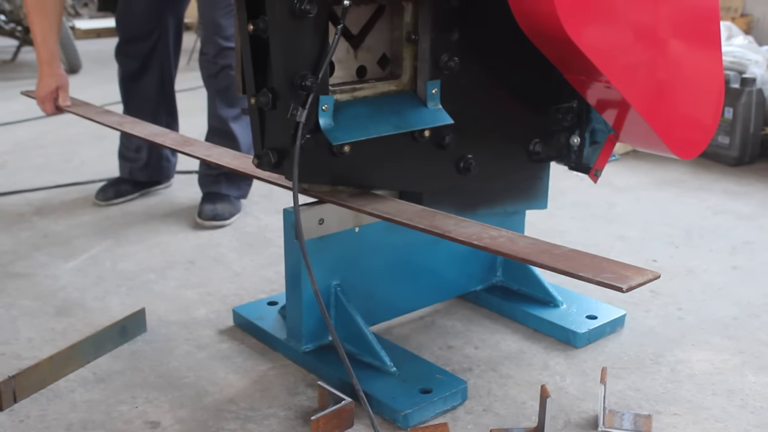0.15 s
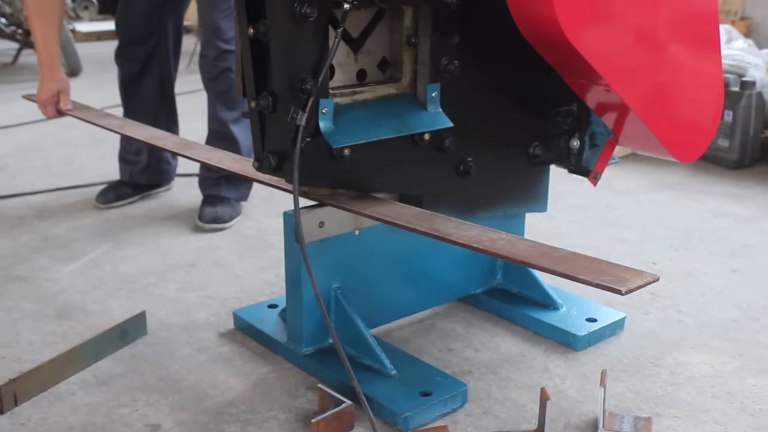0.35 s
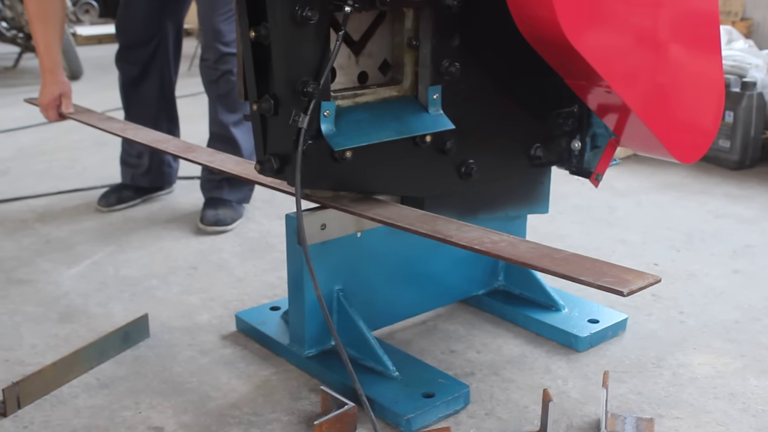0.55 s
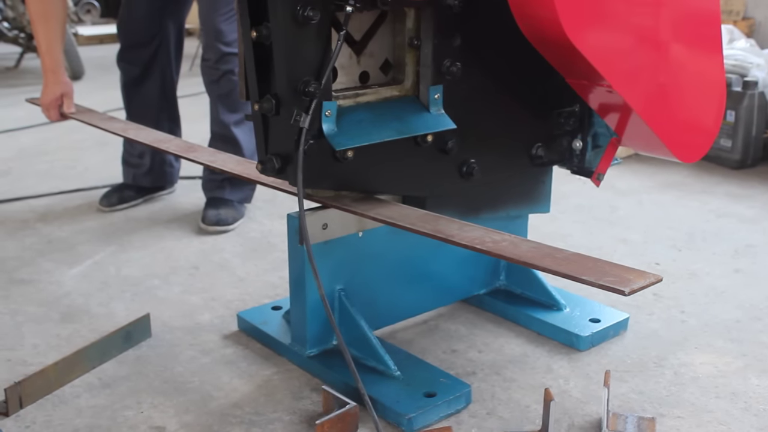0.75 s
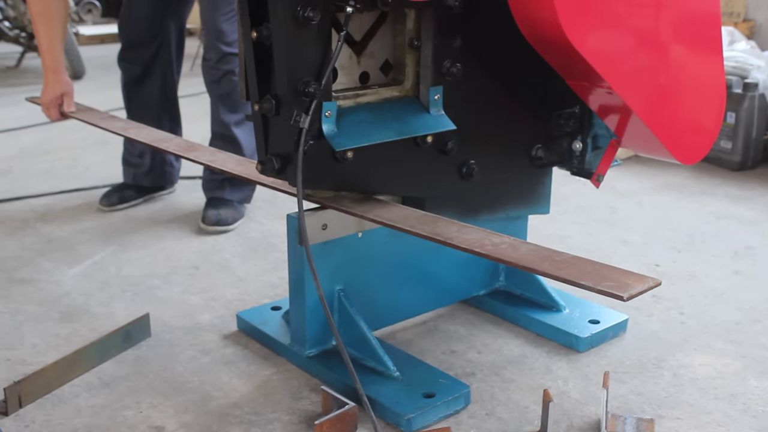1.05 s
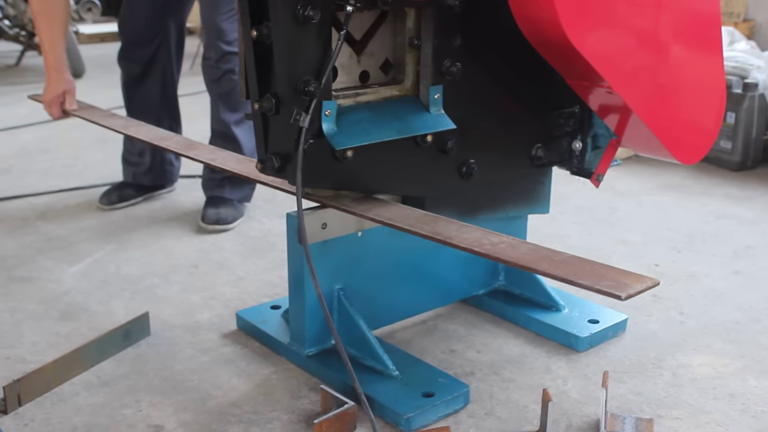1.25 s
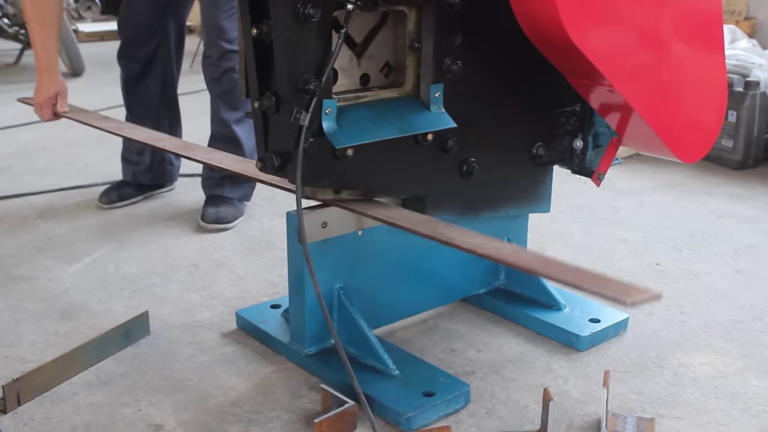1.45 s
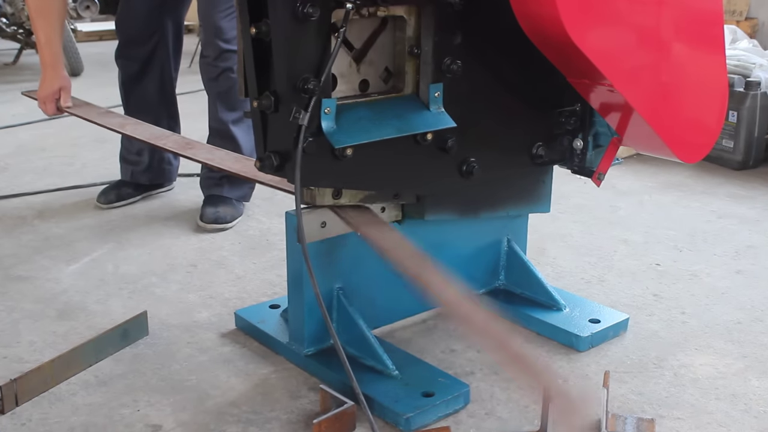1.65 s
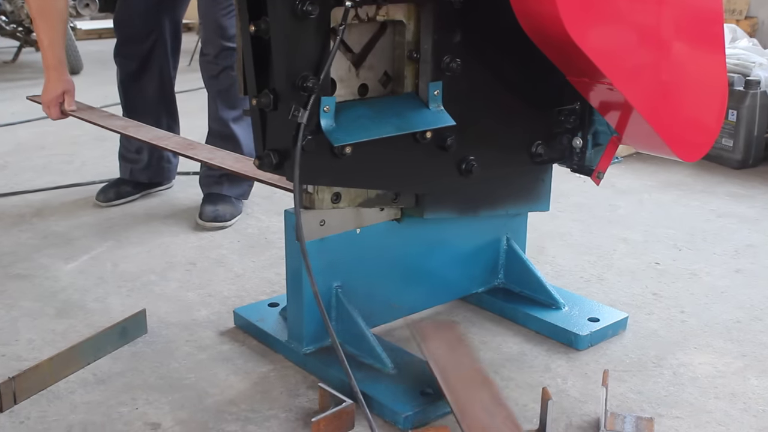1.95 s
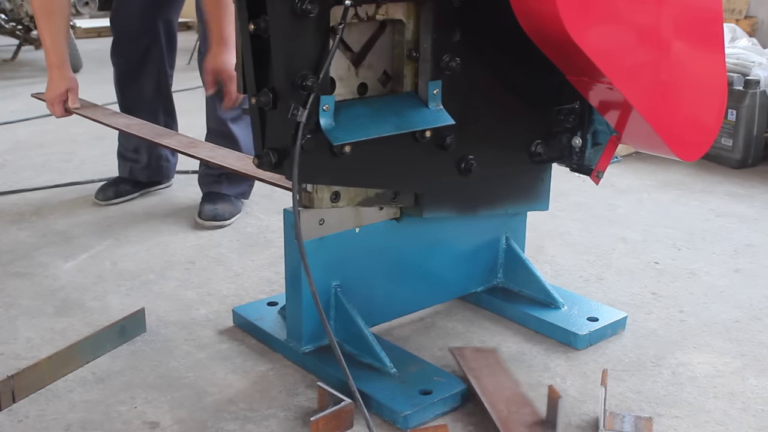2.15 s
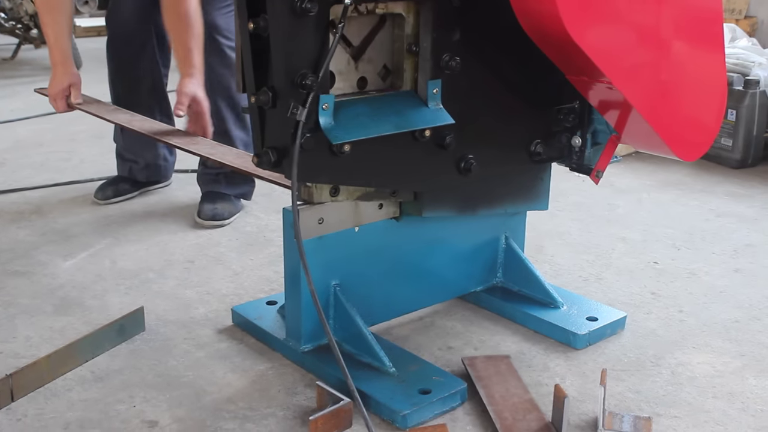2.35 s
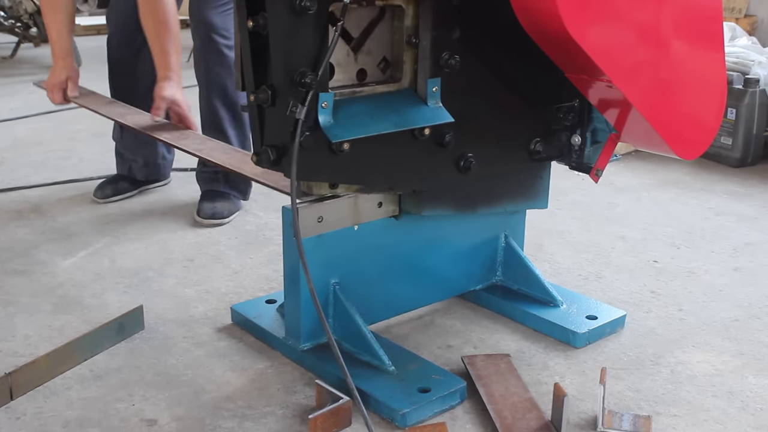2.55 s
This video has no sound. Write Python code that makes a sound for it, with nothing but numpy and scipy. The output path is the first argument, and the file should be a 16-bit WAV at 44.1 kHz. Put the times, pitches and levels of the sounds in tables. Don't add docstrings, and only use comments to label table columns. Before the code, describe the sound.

Steel offcut crashing on a concrete yard floor: first low gusty wind rumble and faint gear grind with a clack, then a quick gritty scrape, a hard slam, and bright metallic bounces and ringing, slightly ducked by automatic gain.

```python
import sys
import numpy as np
from scipy import signal
from scipy.fft import rfft, irfft, next_fast_len
from scipy.io import wavfile
from scipy.ndimage import uniform_filter1d, map_coordinates

SR = 44100
rng = np.random.default_rng(int(sys.argv[2]) if len(sys.argv) > 2 else 0)


def generate_wav(sig):
    pcm = np.round(np.clip(np.atleast_2d(sig).T, -1, 1) * 32767).astype(np.int16)
    wavfile.write(sys.argv[1], SR, pcm)


def boost_factor(decibels):
    exponent = np.asarray(decibels, float) / 20
    return 10 ** exponent


N = 119511

# (time [s], level [dB])
WIND_LEVEL = [(0, -26.5), (.25, -17.5), (.66, -16), (.72, -28.5), (.86, -25.5), (.95, -26), (1.7, -18),
              (1.8, -35), (2.1, -33), (2.3, -45), (2.71, -31)]
# (time [s], level [dB], half width [s])
GUSTS = [(0.031, -26, 0.019), (0.117, -6.5, 0.0043), (0.122, -12, 0.022), (0.144, -10.5, 0.0029),
         (0.223, -10.5, 0.0075), (0.252, -17, 0.02), (0.332, -8.5, 0.014), (0.405, -22, 0.0045),
         (0.447, -14, 0.005), (0.292, -12.5, 0.011), (0.363, -10.5, 0.019), (0.465, -10.5, 0.021),
         (0.589, -13.5, 0.0073), (0.609, -9, 0.007), (0.661, -6.5, 0.0041), (0.821, -16.5, 0.0031),
         (0.968, -14, 0.045), (0.755, -19, 0.0031), (0.912, -15, 0.0042), (1.038, -20, 0.005),
         (1.066, -9.5, 0.024), (1.16, -14.5, 0.0055), (1.218, -12, 0.023), (1.225, -7.5, 0.0034),
         (1.302, -10.5, 0.026), (1.252, -11.5, 0.0055), (1.332, -13.5, 0.004), (1.376, -16.5, 0.004),
         (1.415, -10, 0.0033), (1.471, -17, 0.015), (1.505, -14.5, 0.007), (1.537, -19, 0.02),
         (1.608, -15, 0.0027), (1.678, -16.5, 0.066), (1.716, -17.5, 0.003), (1.918, -25.5, 0.0072),
         (1.969, -23.5, 0.021), (2.018, -24.5, 0.027), (2.199, -27, 0.022), (2.392, -30, 0.056),
         (2.477, -22, 0.015), (2.562, -22.5, 0.021), (2.627, -19, 0.017), (2.664, -13, 0.0057)]
# (frequency [Hz], density [dB])
RUMBLE_SPECTRUM = [(25, -17.5), (70, -6.5), (110, 0), (220, 0), (470, -7), (1100, -22.5), (2000, -40),
                   (4000, -70)]
# (frequency [Hz], density [dB])
EDDY_EDGE_SPECTRUM = [(250, -8.5), (600, -8), (1000, -7.5), (2000, -19), (4000, -56.5)]

# (time [s], level [dB])
GEAR_LOAD = [(0, -31.5), (.3, -31), (.4, -36), (.55, -31), (.73, -35.5), (.95, -25.5), (1.05, -26),
             (1.2, -25.5), (1.35, -35), (1.5, -30.5), (1.72, -26.5)]
# (frequency [Hz], density [dB])
HISS_SPECTRUM = [(200, -6), (400, -4), (1000, -11.5), (1500, -9), (3100, -27.5), (6300, -18.5), (7400, -29),
                 (15600, -60)]
# (frequency [Hz], width [Hz], boost [dB])
CASING = [(1540, 790, 8), (3582, 13.5, 24), (3626, 7.4, 12), (3930, 1320, 14), (6335, 670, 8),
          (11450, 320, 17)]
# (frequency [Hz], density [dB])
GRIND_SPECTRUM = [(500, -19.5), (1500, 1), (2200, -1), (5000, -13.5), (10000, -37.5), (15000, -44)]
# (time [s], level [dB], t60 [s])
CLACKS = [
    (.472, -13, 0.045),
]
# (frequency [Hz], width [Hz], level [dB])
LINKAGE = [(1178, 41, 18.5), (2650, 106, 4.5), (4000, 500, -26), (8400, 200, -27)]
# (time [s], level [dB], t60 [s])
KNOCKS = [
    (1.066, -17, .12),
]
# (time [s], level [dB])
PUFFS = [
    (.09, -54),
    (.6, -46),
    (1.072, -54),
    (1.21, -51),
    (1.726, -49),
]

# (time [s], level [dB])
SCRAPE_LEVEL = [(1.718, -49), (1.723, -23), (1.74, -27), (1.753, -15), (1.757, -10.5), (1.772, -9.5),
                (1.782, -13), (1.79, -48)]
# (time [s], peak level [dB])
SLIPS = [
    (1.748, -9),
    (1.7556, 1),
    (1.759, -3),
    (1.7635, -1),
    (1.7705, -1),
    (1.775, -8),
]
# (frequency [Hz], width [Hz], level [dB])
TABLE_EDGE = [(2190, 600, -4), (2690, 300, 1.5), (3700, 500, -8.5), (7000, 2900, -27), (13000, 3000, -58)]

# (time [s], blow level [dB], then levels of the three loud bending modes [dB])
HITS = [(1.782, -11, -31, -17, -18), (1.794, -8, -25, -16, -8), (1.822, -34, -19, -21, -26),
        (1.904, -19, -11, -24, -23), (1.914, -23, -8, -18, -24), (1.942, -34, -26, -27, -31),
        (1.99, -38, -21, -31, -43), (2.041, -29, -17, -10, -24), (2.07, -23, -11, -12, -20),
        (2.102, -30, -15, -16, -33), (2.176, -23, -26, -22, -18), (2.209, -24, -16, -13, -19),
        (2.256, -26, -18, -12, -18), (2.293, -33, -28, -32, -35), (2.315, -35, -28, -29, -39),
        (2.36, -40, -30, -34, -46), (2.43, -42, -30, -43, -38), (2.455, -43, -31, -32, -39),
        (2.55, -43, -33, -38, -39), (2.64, -45, -35, -34, -39)]
# (bright modes together [dB], then levels of the four twisting modes [dB])
TWISTS = [(-18, -31, -12, -35, -25), (-13, -17, -19, -24, -20), (-33, -30, -36, -38, -43),
          (-31, -26, -42, -24, -29), (-35, -30, -32, -30, -32), (-41, -39, -47, -42, -42),
          (-46, -43, -52, -43, -47), (-43, -32, -37, -41, -43), (-29, -28, -31, -42, -37),
          (-42, -34, -32, -43, -38), (-28, -30, -30, -33, -39), (-29, -36, -39, -33, -32),
          (-30, -28, -33, -38, -37), (-46, -44, -45, -47, -48), (-42, -46, -39, -44, -45),
          (-45, -44, -45, -44, -44), (-47, -42, -43, -47, -50), (-46, -44, -40, -50, -47),
          (-46, -45, -45, -46, -48), (-49, -49, -47, -54, -52)]
EDGEWISE = [(-42, -20, -27), (-27, -26, -19), (-41, -36, -26), (-45, -32, -34), (-23, -29, -37),
            (-31, -31, -38), (-35, -32, -40), (-35, -37, -38), (-30, -38, -44), (-40, -39, -49),
            (-34, -45, -30), (-36, -38, -28), (-36, -33, -37), (-48, -45, -48), (-49, -51, -46),
            (-47, -47, -43), (-53, -48, -38), (-58, -45, -47), (-53, -53, -44), (-47, -47, -43)]
LOUD_HZ = [1900, 2652, 3520]
TWIST_HZ = [3124, 3900, 4506, 4760]
EDGEWISE_HZ = [1003, 1753, 2405]
EDGEWISE_DBS = [-4, 0, 0]
MIDDLE_HZ = [3965, 5585, 5706, 6490, 6865]
MIDDLE_DBS = [-10, -5, -5, -20, -13]
UPPER_HZ = [7337, 7870, 8208, 8650, 9084, 9796, 10364, 11055, 11773, 12728, 13218, 13845, 14790, 15140]
UPPER_DBS = [-23, -19, -26, -24, -27, -34, -32, -33, -38, -39, -41, -39, -42, -46]
FREE_HZ = [774, 1145, 1275, 1384]
FREE_DBS = [-33, -28.5, -24, -40]
# (time [s], level [dB], t60 [s])
THUDS = [
    (1.912, -4.5, 0.084),
    (1.957, -16, 0.064),
    (2.066, -17, .06),
]
# (frequency [Hz], density [dB])
THUD_SPECTRUM = [(300, -9.5), (650, 0), (1000, 1), (1600, -8.5), (3000, -41.5), (6000, -91)]
# (time [s], level [dB], t60 [s])
SLAM = [
    (1.7828, 1, .035),
    (1.788, -2, .03),
    (1.795, -2, .08),
]
# (frequency [Hz], density [dB])
CRACK_SPECTRUM = [(400, -17.5), (1000, -1.5), (2000, 0.5), (3800, 8), (6000, -3.5), (8500, -12),
                  (11000, -44.5), (15500, -45)]
# (time [s], level [dB])
GAIN = [(0, 3), (1.755, -1.5), (1.81, -14.5), (2.08, -7.5), (2.35, -11), (2.71, -5)]


def unit(x):
    return x / np.sqrt(np.mean(x ** 2) + 1e-20)


def along(points, hz):
    f, v = np.transpose(points)
    return np.interp(np.log(hz + 1), np.log(f + 1), v)


def curve(rows):
    return np.interp(np.arange(N) / SR, *np.transpose(rows))


def wobble(rate):
    knots = rng.standard_normal(int(N * rate / SR) + 4)
    return map_coordinates(knots, [np.arange(N) * rate / SR])


def filtered(x, response):
    m = next_fast_len(N + SR // 2)
    return irfft(rfft(x, m) * response(np.fft.rfftfreq(m, 1 / SR)), m)[:N]


def noise(spectrum):
    points = [(7.3, -93.5)] + list(spectrum)
    return unit(filtered(rng.standard_normal(N), lambda hz: boost_factor(along(points, hz))))


def body(peaks):
    def response(f):
        total = 0
        for k, (centre, width, db) in enumerate(peaks):
            loss = 1j * f * width
            total = total + (-1) ** k * boost_factor(db) * loss / (centre ** 2 - f ** 2 + loss)
        return total
    return response


def bursts(rows):
    t = np.arange(N) / SR
    return sum(boost_factor(db - 60 * np.clip(t - s, 0, 9) / t60) * (t >= s) for s, db, t60 in rows)


def port_thumps():
    t = np.arange(N) / SR
    thump_db, thump_s, thump_hz, narrow_s = 6, .0022, 290, .007
    x = np.zeros(N)
    for s, db, width in GUSTS:
        detune, turn = rng.standard_normal(2)
        pulse = boost_factor(db + thump_db) * np.exp(-(width / narrow_s) ** 2 - ((t - s) / thump_s) ** 2)
        x += pulse * np.cos(2 * np.pi * thump_hz * (1 + 0.41 * detune) * (t - s) + 3 * turn)
    return x


def wind():
    t = np.arange(N) / SR
    wind_db, lump_db, flutter_db, even = -2, 2, 5, 0.62
    edge_db, edge_grows = -9, 1.94
    power = boost_factor(2 * curve(WIND_LEVEL))
    power = power + sum(boost_factor(2 * db) * np.exp(-((t - s) / width) ** 2) for s, db, width in GUSTS)
    air = boost_factor(lump_db * wobble(25.17) + flutter_db * wobble(110)) * noise(RUMBLE_SPECTRUM)
    air = unit(air / np.abs(uniform_filter1d(air ** 2, size=900)) ** (even / 2))
    port = power * boost_factor(-2 * curve(GAIN))
    edge = unit(boost_factor(3.6 * wobble(120)) * noise(EDDY_EDGE_SPECTRUM))
    edge = edge * boost_factor(edge_db) * (port / port.max()) ** ((edge_grows - 1) / 2)
    return boost_factor(wind_db) * (np.sqrt(port) * (air + edge) + port_thumps() * boost_factor(-curve(GAIN)))


def gears():
    load_db = curve(GEAR_LOAD) + 30
    hiss_grows, grind_grows, uneven_db = 0.78, 1.14, 1.2

    def casing(f):
        return boost_factor(sum(db / (1 + (2 * (f - c) / w) ** 2) for c, w, db in CASING))

    hiss_level = boost_factor(hiss_grows * load_db - 31.5 + uneven_db * wobble(12.05))
    hiss = hiss_level * unit(filtered(noise(HISS_SPECTRUM), casing))
    grind_level = boost_factor(grind_grows * load_db - 32.5 + uneven_db * wobble(25))
    return hiss + grind_level * noise(GRIND_SPECTRUM)


def linkage():
    ring = unit(filtered(rng.standard_normal(N), body(LINKAGE)))
    clacks = uniform_filter1d(bursts(CLACKS), size=90) * ring
    return clacks + uniform_filter1d(bursts(KNOCKS), size=90) * noise(GRIND_SPECTRUM)


def clutch_puffs():
    t = np.arange(N) / SR
    puff_s, puff_hz = 0.015, 8000
    air = filtered(rng.standard_normal(N), lambda f: f ** 2 / (f ** 2 + puff_hz ** 2))
    return air * sum(boost_factor(db) * np.exp(-((t - s) / puff_s) ** 2) for s, db in PUFFS)


def machine():
    return gears() + linkage() + clutch_puffs()


def scrape():
    t = np.arange(N) / SR
    dull_hz = 7000
    grit = unit(filtered(rng.standard_normal(N) * boost_factor(2.1 * wobble(600)), body(TABLE_EDGE)))
    kicks = np.zeros(N)
    for s, db in SLIPS:
        kicks[round(s * SR)] = boost_factor(db + 25)
    touching = (t > SCRAPE_LEVEL[0][0]) * (t < SCRAPE_LEVEL[-1][0])
    x = grit * boost_factor(curve(SCRAPE_LEVEL)) * touching + filtered(kicks, body(TABLE_EDGE))
    return filtered(x, lambda f: 1 / (1 + 1j * (f / dull_hz) - (f / dull_hz) ** 2))


def mode(hz, levels_db):
    soft_db, hard_db = -33, -27
    sag_db, sag_s = 8, .025
    drain_s, rise_s = .011, .0013
    waver_db, rocks_from_s = 3.8, 2.29
    t60 = 1.3 * (2000 / hz) ** .9
    start, blow_db = np.transpose(HITS)[:2]
    hard = np.clip((blow_db - soft_db) / (hard_db - soft_db), 0, 1)
    t = np.arange(round(start[0] * SR), N) / SR
    k = np.clip(np.searchsorted(start, t, side="right") - 1, 0, None)
    since = t - start[k]
    left_db = np.roll(levels_db - sag_db * hard, 1)
    excess_db = (1 - hard) * np.clip(left_db - levels_db, 0, None)
    level_db = levels_db[k] - 60 * since / t60
    level_db += excess_db[k] * np.exp(-since / drain_s)
    level_db -= sag_db * hard[k] * (1 - np.exp(-since / sag_s))
    level_db += waver_db * np.where(t > rocks_from_s, 1, .2) * wobble(55)[N - len(t):]
    phase = np.cumsum(2 * hard * rng.standard_normal(len(HITS)))
    swing = boost_factor(level_db) * np.exp(1j * phase[k])
    keep = np.exp(-1 / (rise_s * SR))
    swing = signal.lfilter([(1 - keep) ** 2], [1, -2 * keep, keep ** 2], swing)
    return np.pad(np.imag(swing * np.exp(2j * np.pi * hz * t)), (N - len(t), 0))


def flat_ring():
    loud_gain_db, quiet_gain_db, free_gain_db = 12, 13.5, 10.5
    scatter_db, floor_damps_db = 3.5, 9
    loud_db = np.transpose(HITS)[2:]
    bright_db, *twist_db = np.transpose(TWISTS)
    edgewise_db = np.transpose(np.add(EDGEWISE, EDGEWISE_DBS))
    x = sum(mode(hz, db + loud_gain_db) for hz, db in zip(LOUD_HZ, loud_db))
    for hz, db in zip(TWIST_HZ + EDGEWISE_HZ, [*twist_db, *edgewise_db]):
        x += mode(hz, db + quiet_gain_db)
    for hz, db in zip(MIDDLE_HZ + UPPER_HZ, MIDDLE_DBS + UPPER_DBS):
        luck_db = scatter_db * rng.standard_normal(len(HITS))
        x += mode(hz, bright_db + db + quiet_gain_db - 1.5 + luck_db)
    damped_db = floor_damps_db * np.sqrt(np.clip(np.arange(len(HITS)) - 2, 0, None))
    for hz, db in zip(FREE_HZ, FREE_DBS):
        luck_db = .5 * scatter_db * rng.standard_normal(len(HITS))
        x += mode(hz, db + free_gain_db - damped_db + luck_db)
    return x


def flat_blows():
    tap_db, tap_t60 = 7, .04
    start, blow_db = np.transpose(HITS)[:2]
    jump_db = np.diff(blow_db, prepend=0).clip(-20, 0)
    levels_db = blow_db + tap_db + jump_db
    taps = [(s, db, tap_t60) for s, db in zip(start, levels_db)][3:]
    thuds = uniform_filter1d(bursts(THUDS), size=150) * noise(THUD_SPECTRUM)
    cracks = bursts(SLAM) + uniform_filter1d(bursts(taps), size=60)
    return thuds + cracks * noise(CRACK_SPECTRUM) * boost_factor(0.46 * wobble(430))


def room(x):
    t60 = .2
    tail = rng.standard_normal(SR // 2) * boost_factor(-60 * np.arange(SR // 2) / SR / t60)
    return signal.fftconvolve(np.pad(x, (300, 0)), tail / np.linalg.norm(tail))[:N]


def scene():
    room_db, ring_room_db = -11, -12
    background = wind() + machine()
    cracks = scrape() + flat_blows()
    ring = flat_ring()
    answer = boost_factor(room_db) * room(cracks + boost_factor(ring_room_db) * ring)
    return (background + cracks + ring + answer)[None]


def band_limit(x):
    return signal.sosfilt(signal.butter(12, 15700, fs=SR, output="sos"), x)


def record(dry):
    clip_hard, top_hz = 12, 15780
    x = dry * boost_factor(curve(GAIN))
    x = x / (1 + np.abs(x) ** clip_hard) ** (1 / clip_hard)
    mix = filtered(x[0], lambda f: f < top_hz)[None]
    return band_limit(mix)


dry = scene()
out = record(dry)
generate_wav(out)
```